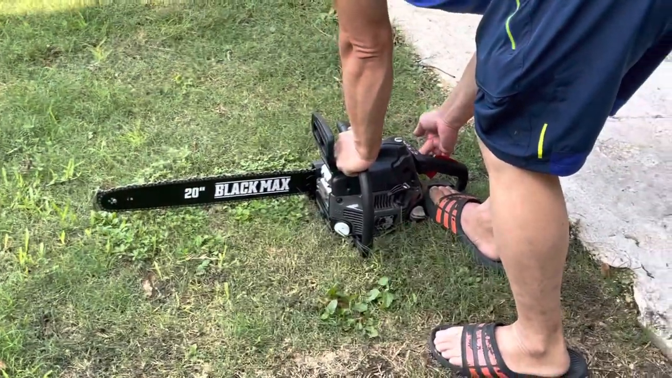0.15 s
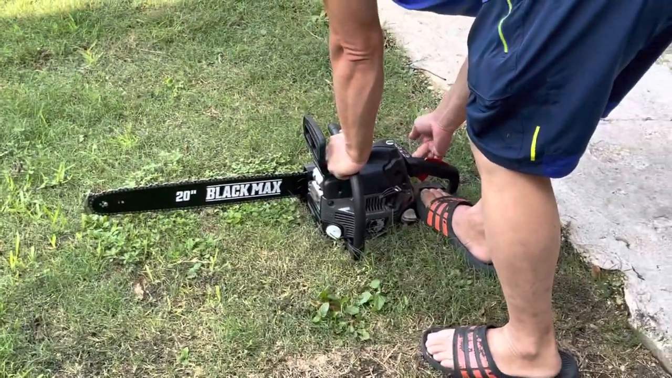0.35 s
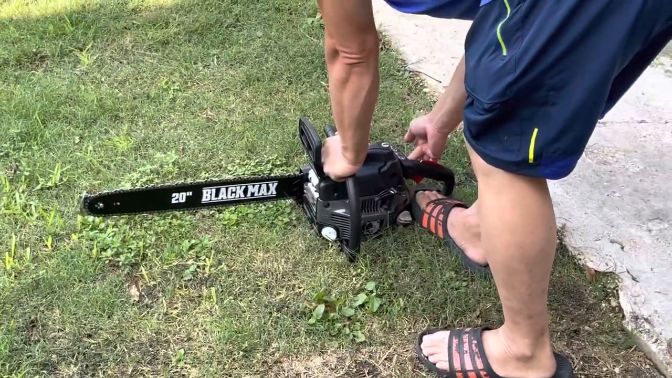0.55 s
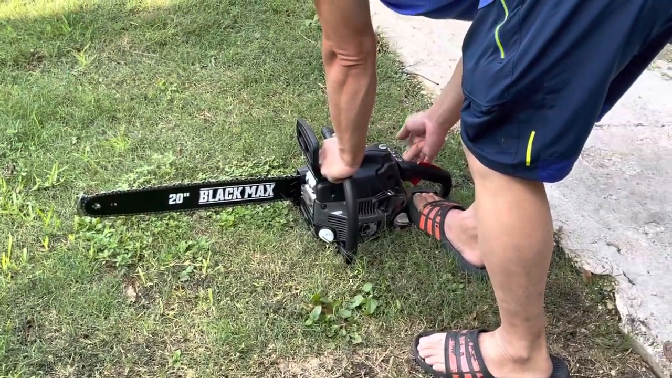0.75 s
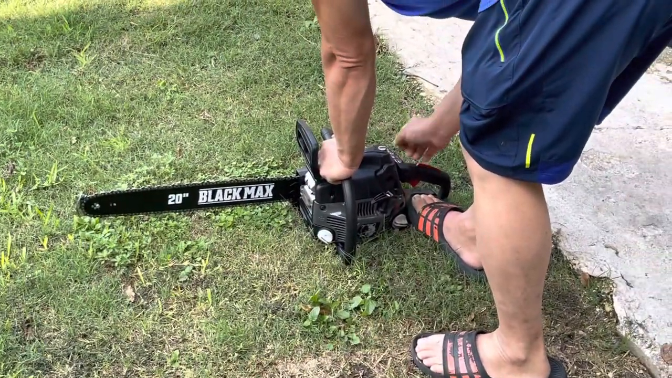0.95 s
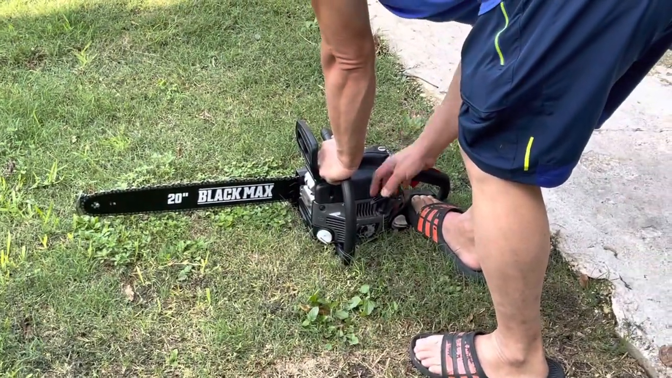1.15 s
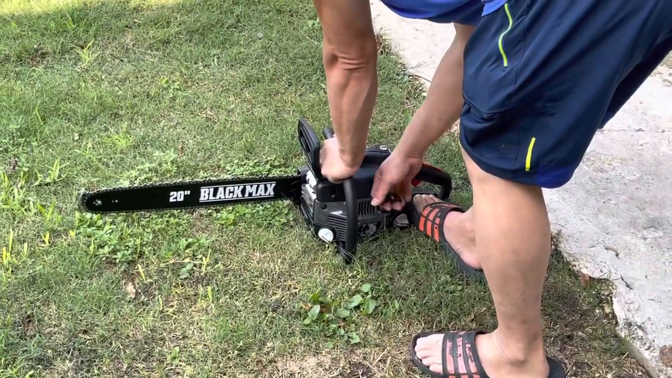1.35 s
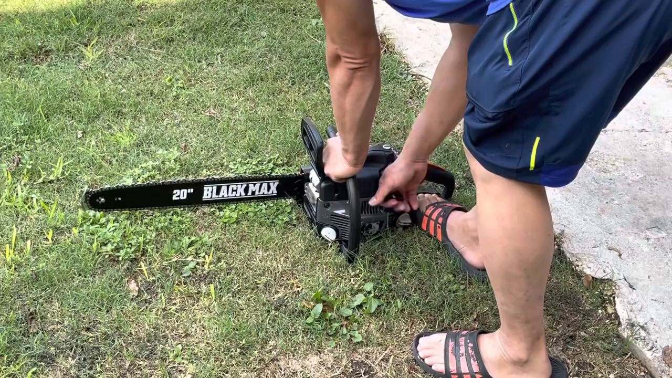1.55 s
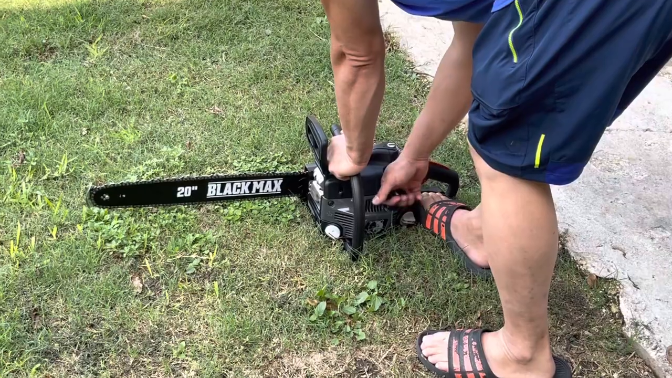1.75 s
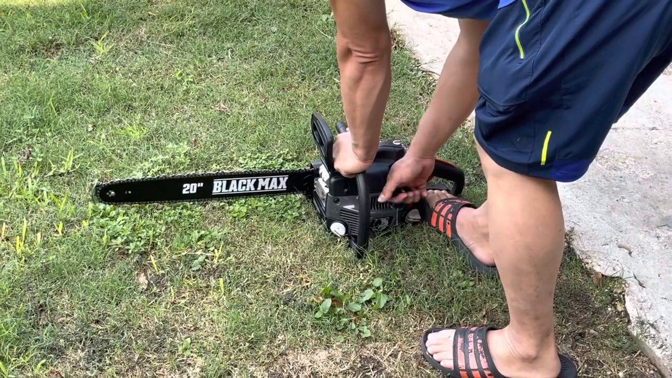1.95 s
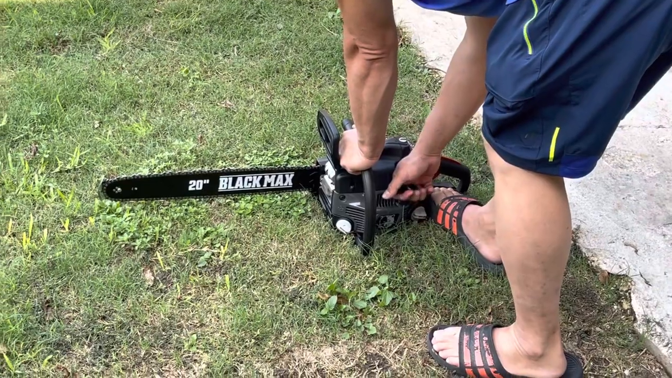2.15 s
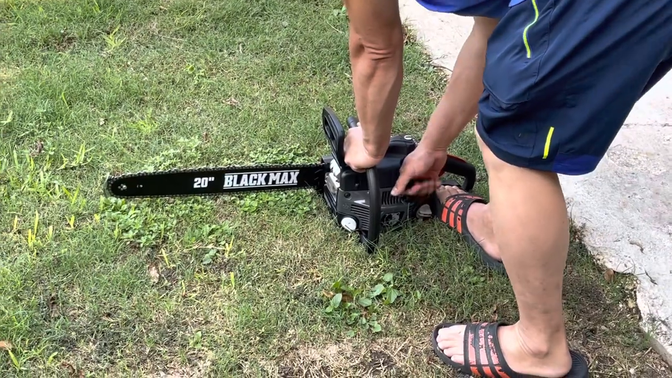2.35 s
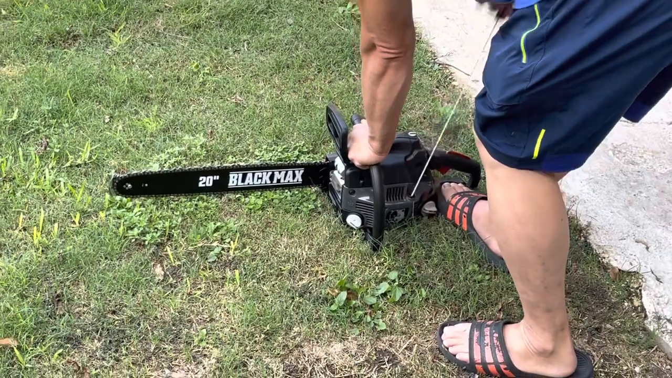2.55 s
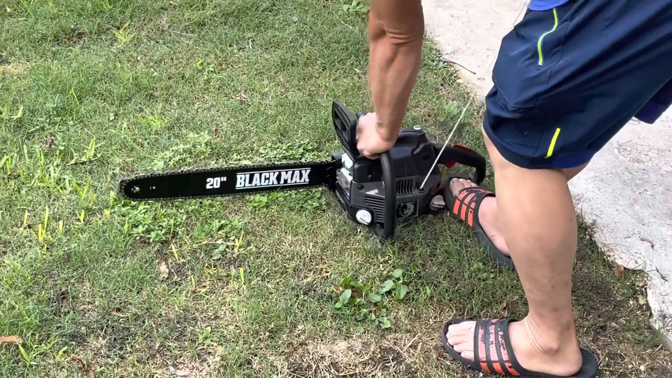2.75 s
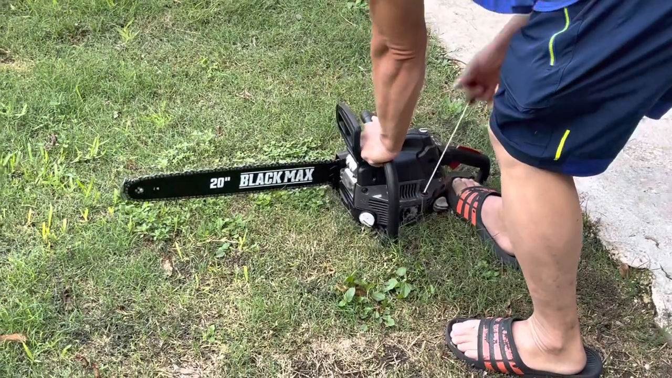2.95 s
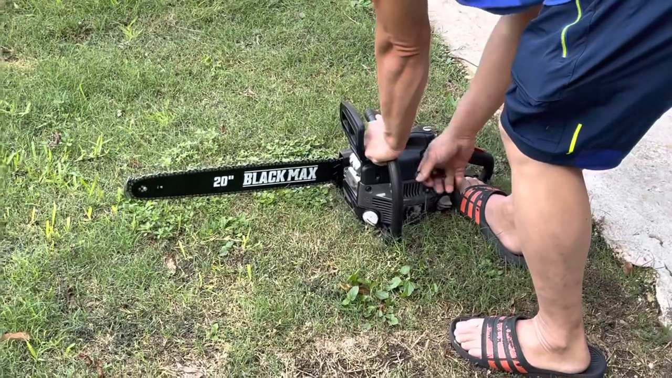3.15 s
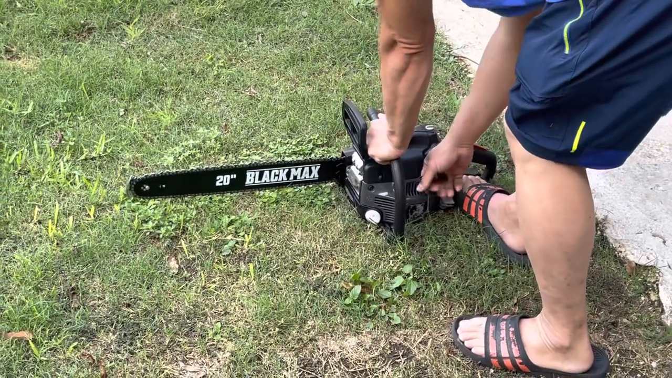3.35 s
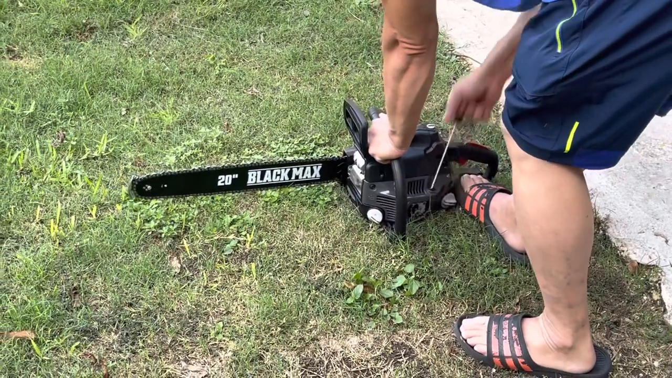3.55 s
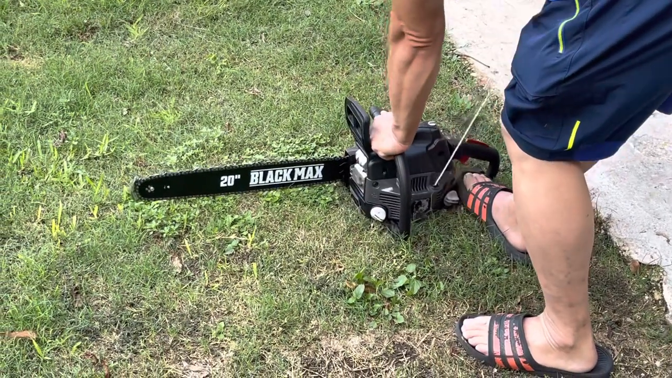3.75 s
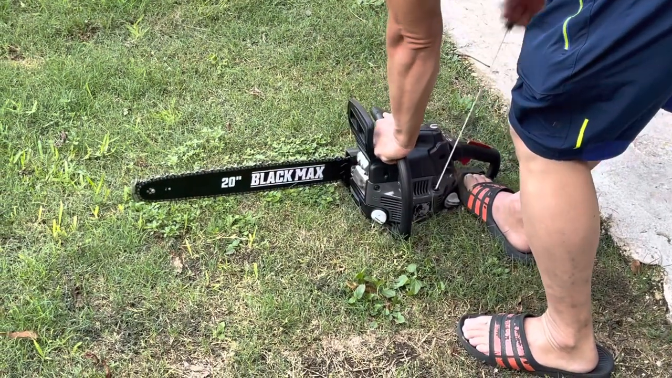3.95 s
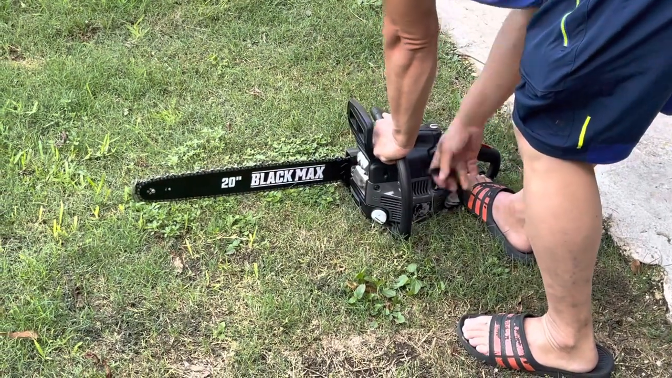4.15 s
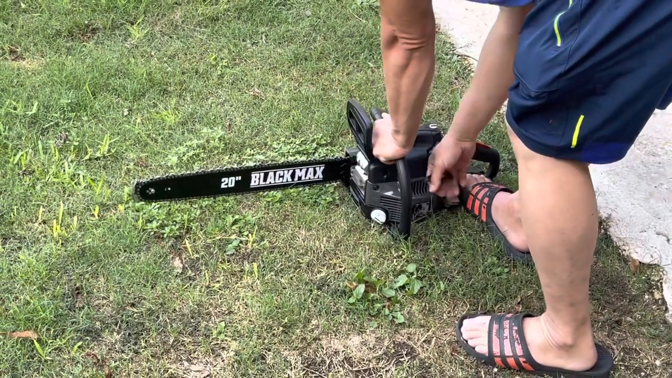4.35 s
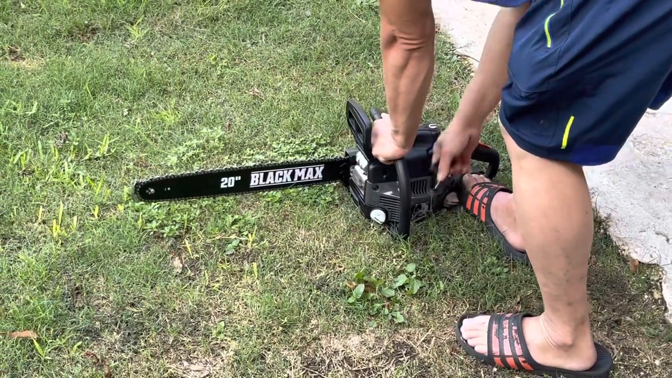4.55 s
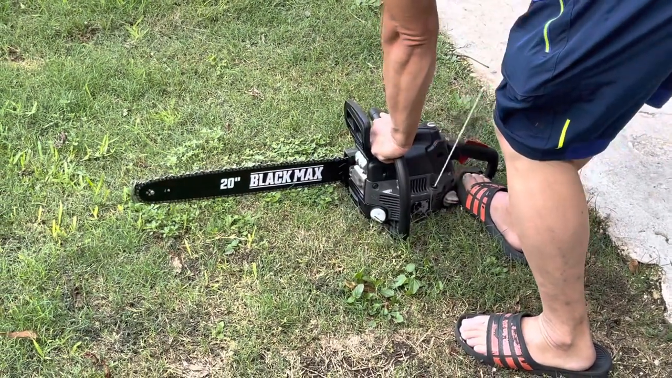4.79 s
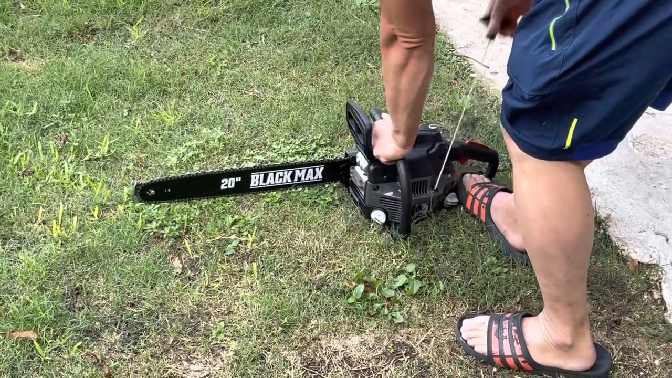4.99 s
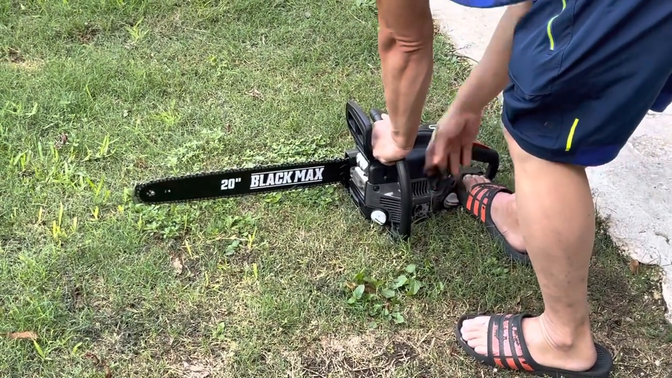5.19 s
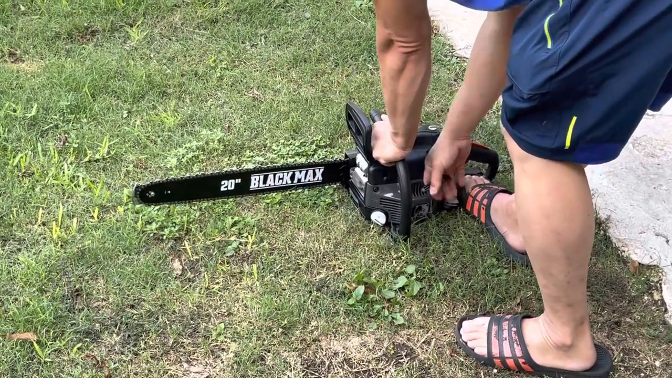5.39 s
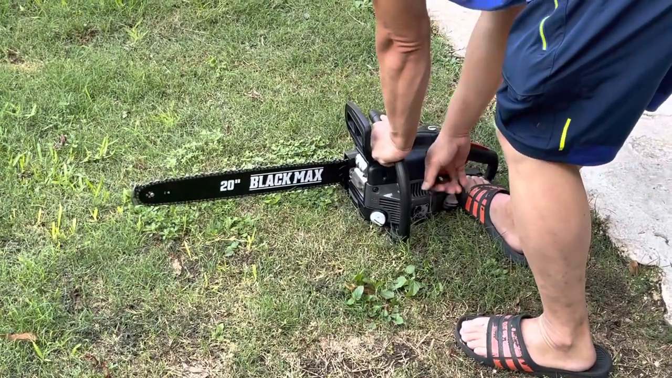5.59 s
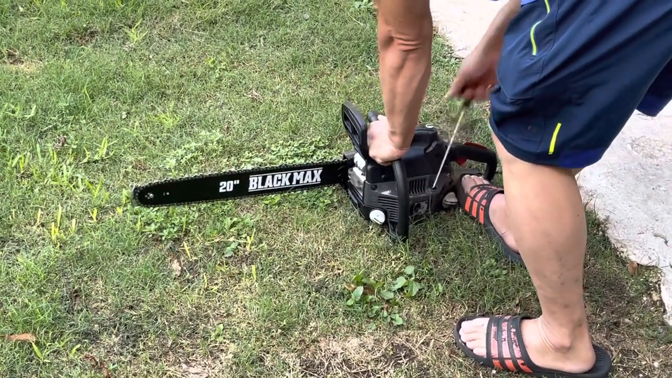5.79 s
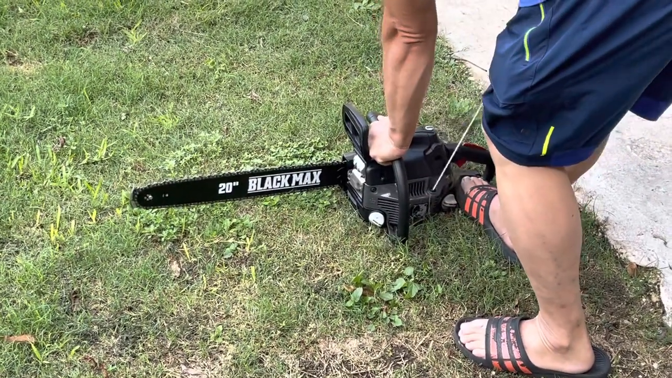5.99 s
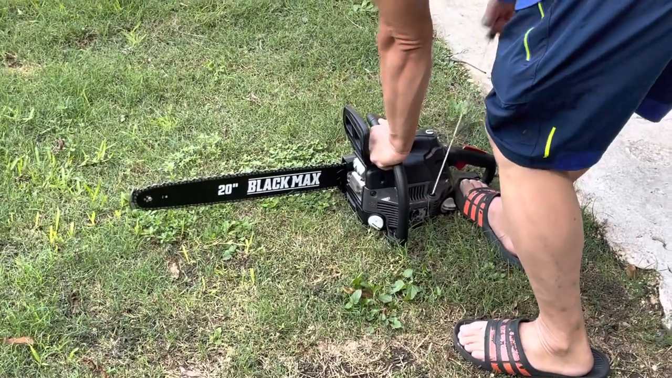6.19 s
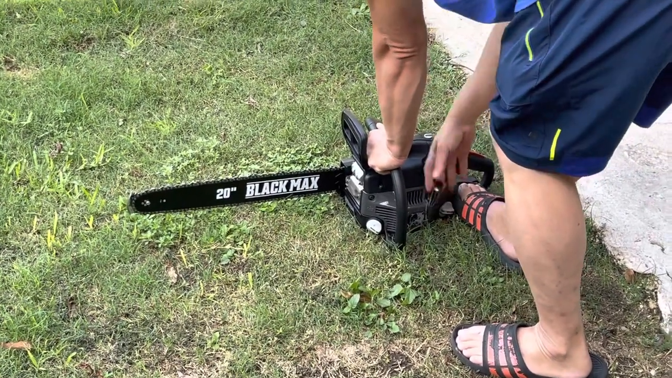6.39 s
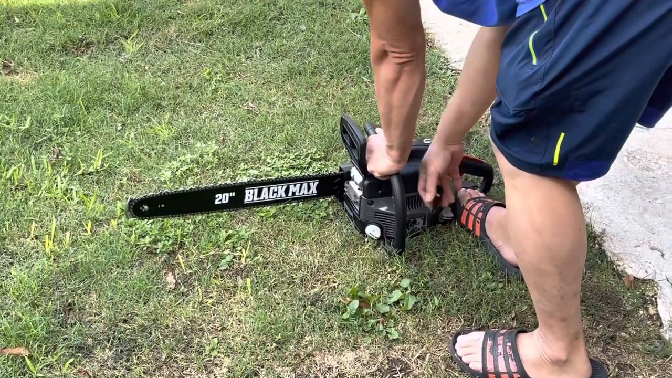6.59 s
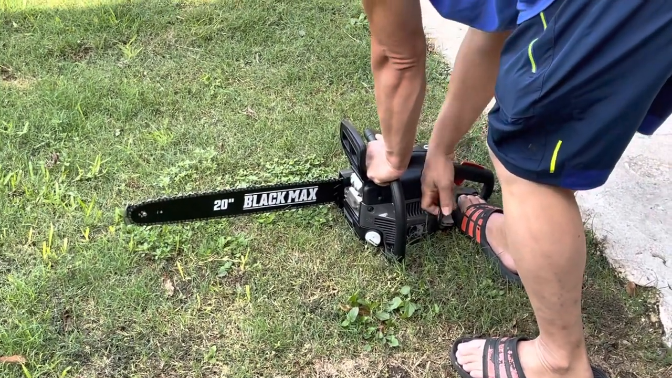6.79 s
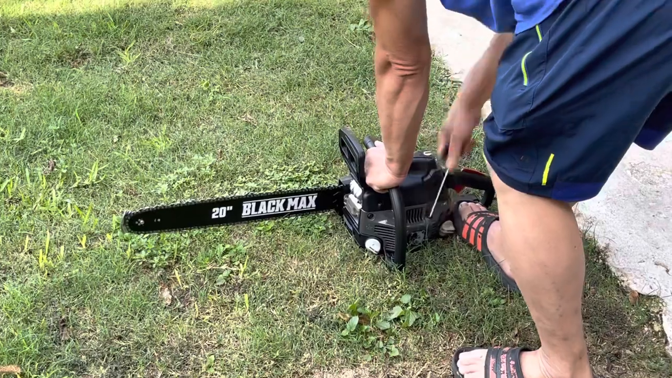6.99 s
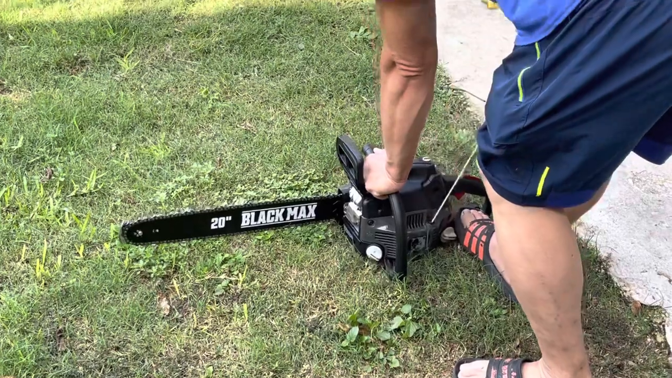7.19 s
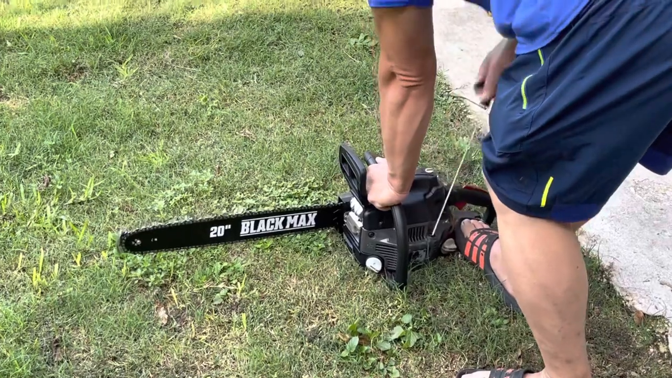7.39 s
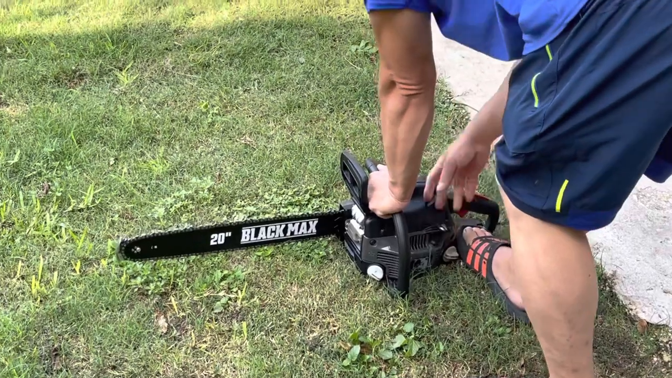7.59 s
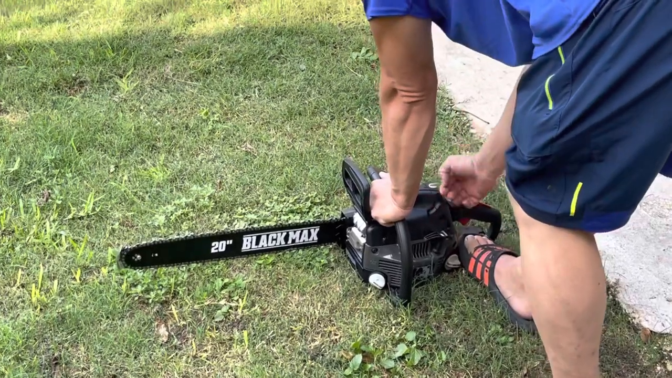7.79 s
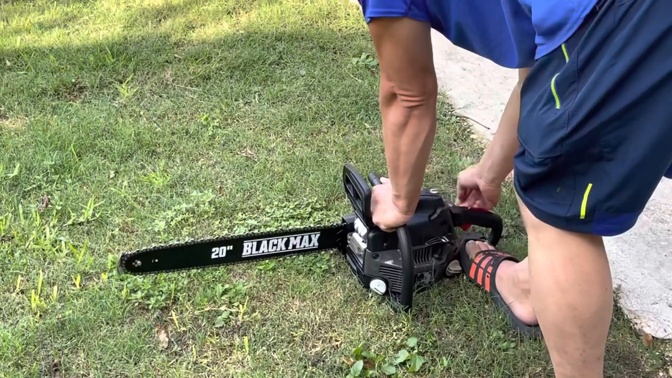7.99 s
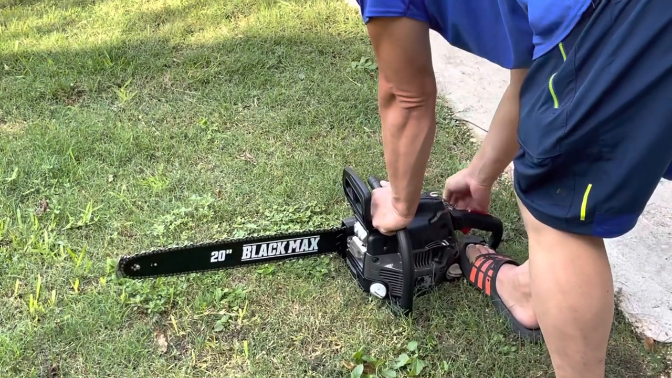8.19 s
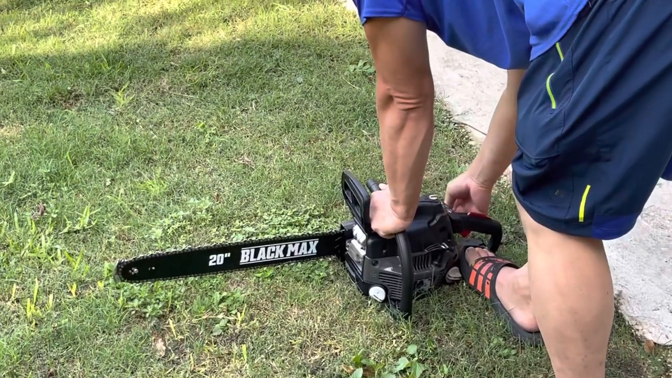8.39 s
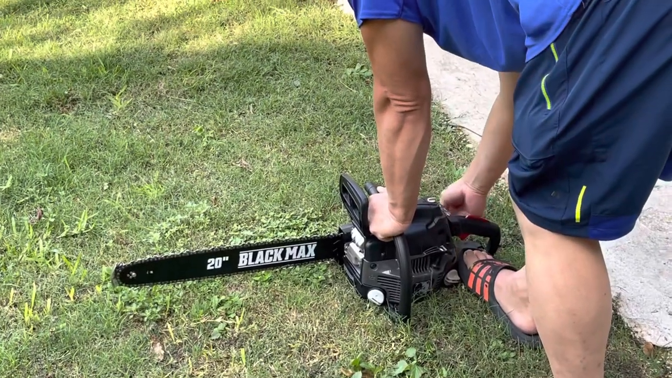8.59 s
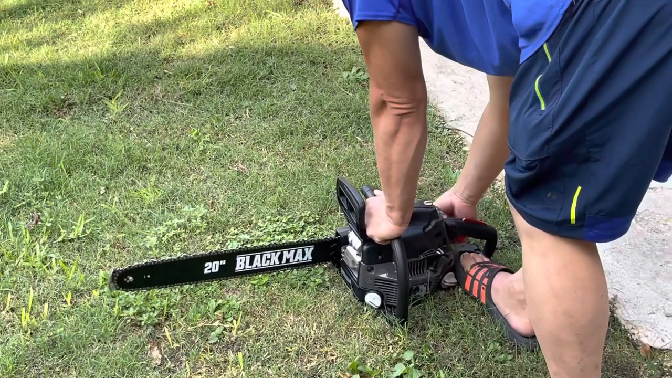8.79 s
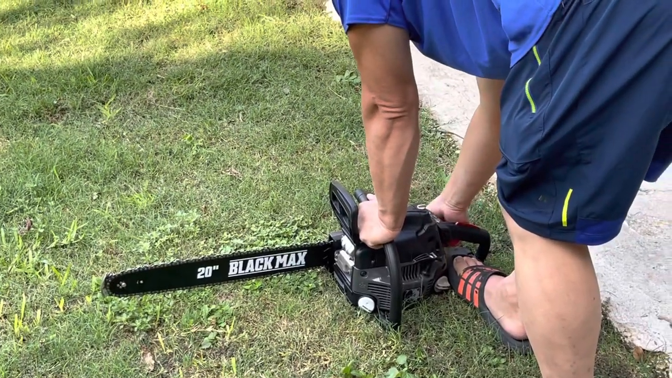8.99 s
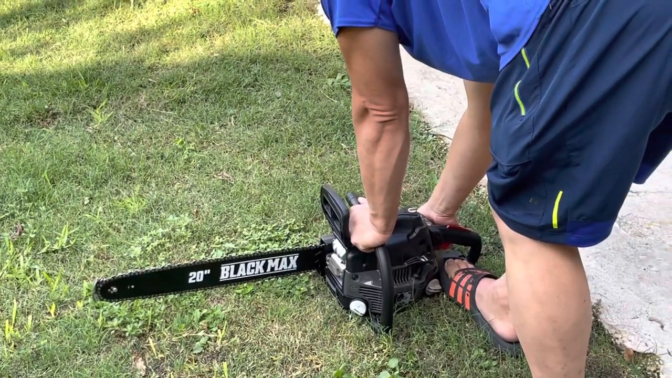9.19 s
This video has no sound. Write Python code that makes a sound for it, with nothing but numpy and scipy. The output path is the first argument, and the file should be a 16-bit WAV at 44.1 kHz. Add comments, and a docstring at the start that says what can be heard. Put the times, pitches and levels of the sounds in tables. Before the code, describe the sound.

On a lawn, a chainsaw's starter cord is yanked five times with dull compression thumps and clicking rewinds, but the engine never fires.

```python
"""A deep hum and distant traffic are heard first, with thin chirps of birds: noise bands and gliding tones.
Then a two-stroke chainsaw on a lawn is pulled five times without firing. Each yank catches with a clack
and thumps the piston over a few compressions: gliding gas pulses and bursts of noise. The cord rewinds over
clicking pawls (noise bursts and ringing modes), and after four of the rewinds the handle snaps home.
Paving and yard answer with early echoes and a decaying tail."""
import sys
import numpy as np
from scipy import signal
from scipy.fft import rfft, irfft, next_fast_len
from scipy.io import wavfile
from scipy.ndimage import uniform_filter1d, map_coordinates

SR = 44100
rng = np.random.default_rng(int(sys.argv[2]) if len(sys.argv) > 2 else 0)


def output_pcm(signal):
    """Save a mono or channel-first signal as 16-bit PCM at the path in sys.argv[1].

    Samples are clipped to [-1, 1] before scaling.
    """
    pcm = np.clip(np.atleast_2d(signal).T, -1, 1) * 32767
    wavfile.write(sys.argv[1], SR, np.round(pcm).astype(np.int16))


N = 407606
TIME = np.arange(N) / SR  # scene time [s]
AGE = np.arange(SR // 3) / SR  # time since a blow [s]

# All levels are relative: the functions weight each layer again.
# Compressions, full ones and then weak ones as the piston stalls: (time [s], thump [dB], rasp [dB])
STROKES = [(2.5057, -5.5, -33.5), (2.5472, -6.5, -33), (2.5955, -10, -33.5), (2.634, -18.5, -49.5),
           (2.651, -19.5, -48), (3.6173, -6.5, -32), (3.6564, -6.5, -32.5), (3.696, -7, -32.5),
           (3.733, -17, -43), (4.700, -4.5, -32), (4.737, -6, -32), (4.787, -16.5, -46),
           (5.8194, -5.5, -34.5), (5.8585, -7, -31), (5.9046, -8, -34.5), (5.942, -18.5, -53.5),
           (5.954, -18.5, -66), (7.0616, -4, -32.5), (7.0994, -6, -31.5), (7.140, -18.5, -43.5),
           (7.162, -17.5, -47)]
# Gas squeezed ahead of each thump: (frequency [Hz], density [dB per Hz])
SQUEEZE_SPECTRUM = [(100, -33), (280, 0.5), (420, 3.5), (580, 4), (680, -5.5), (800, -6), (1000, -30),
                    (1450, -5), (2000, -43), (6000, -100)]
# Breath of gas with each thump: (frequency [Hz], density [dB per Hz])
PUFF_SPECTRUM = [(50, -18.5), (110, 10.5), (230, 21), (550, 12), (780, -2), (1050, -19.5), (3000, -58)]
# Cranking rasp, also the cord and the spring: (frequency [Hz], density [dB per Hz])
RASP_SPECTRUM = [(300, -14), (1000, -17), (1450, 0.5), (3300, 2), (4500, -5.5), (9000, -4.5), (10700, -2),
                 (13000, -18), (16000, -54.5)]
# Crankcase modes: (frequency [Hz], level [dB], t60 [s])
CRANKCASE_MODES = [(2104, 6, 0.12), (2750, 9, 0.04), (3860, 7, 0.065), (7050, -10.5, 0.101)]

# Yanks: (starter catches [s], lets go [s], knock of letting go [dB])
PULLS = [(2.495, 2.655, -31.5), (3.605, 3.7546, -27), (4.689, 4.797, -27), (5.8103, 5.958, -28),
         (7.0535, 7.155, -27)]
# Rewinds: (start [s], end [s], clatter [dB], steel ring against the clatter [dB])
REWINDS = [(2.816, 3.17, -26, -11), (3.901, 4.214, -24.5, -5), (4.983, 5.216, -25.5, -14.5),
           (6.132, 6.372, -25.5, -6), (7.379, 7.591, -25.5, -11.5)]
# Pawls snapping off their teeth: (time [s], ping level [dB])
CLICKS = [(2.844, -15), (2.867, -21.5), (2.888, -3), (2.9089, -3), (2.9283, -17.5), (2.949, -3), (2.97, -4),
          (2.991, -7), (3.017, -12.5), (3.0478, 1.5), (3.1039, -5), (3.9168, -9), (3.935, -8), (3.952, -18),
          (3.969, -5), (3.987, -21), (4.004, -12), (4.0256, -14), (4.045, -13), (4.0683, -19.5),
          (4.092, -14.5), (4.123, -5), (4.161, -13.5), (5.008, -10), (5.034, -15), (5.0585, -3.5),
          (5.0827, -8), (5.106, -4), (5.1262, -21.5), (5.1558, -14.5), (5.186, 0.5), (6.1528, -5.5),
          (6.177, -15), (6.1978, -1.5), (6.22, -2), (6.2398, -3.5), (6.2598, 1.5), (6.2806, -5),
          (6.3005, -9.5), (6.32, -4.5), (6.335, -3), (7.411, -25), (7.4404, -8), (7.469, -11), (7.496, 0.5),
          (7.526, -13), (7.550, -6.5)]
# A pawl engaging as slack is taken up: (time [s], clatter [dB], flywheel ring [dB], favoured mode [Hz])
ENGAGES = [(3.506, -32.5, -31, 4590), (4.568, -30.5, -36, 4050)]
# Starter clicks: (frequency [Hz], density [dB per Hz])
CLICK_SPECTRUM = [(300, -63.5), (600, -10.5), (1200, -26.5), (2100, -11), (3500, -10.5), (6200, -12.5),
                  (7100, -8.5), (7700, -12), (8500, -4), (9300, -7), (10600, 4.5), (11500, -7.5),
                  (13000, -11.5), (14200, -16.5), (16000, -28.5)]
# Flywheel modes: (frequency [Hz], level [dB], t60 [s])
FLYWHEEL_MODES = [(2137, -14, .13), (3768, -6, .09), (3950, -9, .08), (4161, -8, .1), (4578, -7.5, .12),
                  (4683, -5.5, .12), (5116, -8, .12), (5740, -12, .1), (6090, -11, .1)]
# Steel pawl modes: (frequency [Hz], level [dB], t60 [s])
PAWL_MODES = [(8880, -7, .08), (9173, -.5, .16), (9300, -7, .12), (11510, 2.5, .08)]
# Plastic starter cover modes: (frequency [Hz], level [dB], t60 [s])
COVER_MODES = [(695, -5.5, 0.032), (1615, -6.5, 0.016)]
# Against the click rate: a faster pulley clatters louder, and chatter and ring grow more
CLATTER_DB_PER_DOUBLING, RATTLE_DB_PER_DOUBLING = 1, 4.5
FLYWHEEL_DB, FLYWHEEL_SCATTER_DB = -4.5, 3  # ring against the clatter, and its standard deviation
TOOTH_RATTLE_DB = -7  # the pawl chatters up the next tooth
TOOTH_HZ, TOOTH_SPREAD_HZ, TOOTH_DB = 3160, 775, 1.5  # each landing has its own pitch
SKID_SHARE, SKID_S = 0.11, 0.007  # it starts higher by this share and sinks with this time constant
COVER_LAG_S = 0.00337  # the cover answers once the pawl has landed

# The handle snapping home: (time [s], level [dB], bounce delay [s], bounce against the first blow [dB])
STOPS = [(4.199, -18, .006, -14), (5.207, -7, 0.005, -1.5), (6.350, -1, .0085, -9.5),
         (7.572, -1, 0.0052, -4.5)]
# Starter housing modes under the handle's blow: (frequency [Hz], level [dB], t60 [s])
SEAT_MODES = [(400, 1.5, .04), (770, 10, 0.019), (1399, 7.5, 0.055), (1840, 3.5, 0.095), (2810, -3, 0.06),
              (3570, 5.5, 0.065)]
# Thud of the saw's body: (frequency [Hz], density [dB per Hz])
THUD_SPECTRUM = [(150, -36), (350, -2), (480, 0), (850, 0), (1300, -20), (4000, -70)]
SETTLE_S = .0025  # the handle's rim strikes first, then it lands flat
THUD_LAG_S, THUD_DB = 0.00514, -22  # the saw's body gives under the blow
SHIVER_DB, SHIVER_T60_S = -26.5, 0.47  # the recoil spring shivers on after the stop

# Loose plastic knocks of handle and controls:
# (time [s], level [dB], brightest [Hz], hollow low part [dB], lift at the brightest [dB])
LOOSE_KNOCKS = [(2.778, -34, 3920, -36, 4), (3.1548, -29, 2480, -3, -2), (3.2141, -20.5, 2300, -11, 7),
                (4.5225, -27, 1590, -9, 6.5), (5.1903, -12.5, 1700, 7, -0.5), (7.587, -11.5, 1400, -2, -4),
                (7.634, -20, 3360, -19, 10), (7.649, -26, 3100, -10, 5), (8.035, -44.5, 2400, -16, 12),
                (9.0723, -41, 3820, -15, 2)]
# Plastic housing: (frequency [Hz], density [dB per Hz])
HOUSING_SPECTRUM = [(120, -43), (350, 13.5), (650, 7), (1400, 4.5), (3400, -1), (4500, -7.5), (7000, -10.5),
                    (11000, -5.5), (13000, -21), (16000, -41.5)]
CATCH_DB = -18.5  # the starter catches with a clack ahead of the first stroke
# A faint hiss of cord in its guide, pulled and rewinding; its level is smoothed over the time given
CORD_OUT_DB, CORD_BACK_DB, CORD_SMOOTH_S = -46.5, -46, 0.28
# Squeaks as the hand shifts: (time [s], length [s], start [Hz], end [Hz], level [dB])
RUBS = [(0.496, 0.033, 2600, 2430, -48.5), (3.339, 0.051, 2550, 2150, -41), (4.332, 0.038, 2560, 1960, -39)]
# Squeak harmonics: (harmonic number, level [dB])
GRIP_HARMONICS = [(1, 1.5), (2, -15), (3, -9)]
SQUEAK_ROUGH_HZ = 320  # rms pitch jitter

# Early echoes of paving and legs: (frequency [Hz], gain [dB])
PAVING_GAIN = [(100, -30.5), (250, -23), (600, -18), (1500, -24), (4000, -22.5), (12000, -25.5)]
# Decay of the yard: (frequency [Hz], t60 [s])
YARD_DECAY = [(150, 0.78), (800, 0.16), (3000, 0.84), (8000, 0.58), (13000, 0.11)]
# Bird whistles: (time [s], length [s], start [Hz], end [Hz], level [dB])
CHIRPS = [(0.8, 0.31, 3990, 3830, -55.5), (1.047, 0.38, 3900, 3870, -55), (1.524, 0.039, 6100, 5730, -49),
          (1.88, 0.145, 5000, 4900, -58), (2.11, 0.12, 6020, 4950, -54)]
# Distant road: (time [s], rumble level [dB], road hiss level [dB])
TRAFFIC = [(0.0, -44, -48), (6.41, -42.5, -47), (8.29, -45.5, -48.5), (8.7, -39, -48.5), (9.24, -37, -49)]
# Outdoor air: (frequency [Hz], density [dB per Hz])
AIR_SPECTRUM = [(25, -14), (40, 3.5), (60, 9), (110, -2.5), (330, -21), (900, -24), (2000, -38.5),
                (4000, -49.5), (7500, -55), (9500, -47.5), (10500, -57.5), (12500, -72.5), (16000, -91)]
# Stereo width of the air: (frequency [Hz], side against mid [dB])
AIR_WIDTH = [(60, -23), (130, -14), (250, -10), (550, -3), (1200, -9), (4000, -6)]
# Engine of a distant vehicle: (time [s], pitch [Hz], level [dB])
DRONE = [(0, 125, -68), (1.2, 121.8, -47), (2.9, 115, -45), (3.3, 112, -35), (3.85, 101, -29),
         (4.2, 92, -36), (5.4, 80, -40), (9.24, 74.4, -86)]
# A deeper hum: (time [s], pitch [Hz], level [dB])
HUM = [(0, 73.8, -38), (.5, 70.7, -23), (.9, 71.3, -47), (6.8, 66.1, -42), (8.7, 60.9, -26),
       (9.24, 59, -32)]
# Phase between the microphone ports: (frequency [Hz], left leads by [radians])
PORT_PHASE = [(300, 0), (1030, -.3), (2000, .35), (3270, .55), (4300, .45), (5430, .1), (6630, -.1),
              (7920, .3), (8610, 0), (9560, -2.1), (10800, -4), (11800, -6.1), (12400, -6.5), (13400, -9.3),
              (15000, -12.4)]
TOP_HZ = 16200  # half amplitude at the band limit


def piston():
    """Gas exchange: gas squeezes past the rising piston, the exhaust port thumps, then the intake puffs."""
    out = np.zeros(N)
    size = len(AGE)
    port = (1 + .5 * np.exp(-AGE / .003)) / (1 + (AGE / .016) ** 8)

    def rasp(db, t60, attack):
        """Friction: a burst of noise from random contact spots."""
        return amp(db) * patchy(noise(RASP_SPECTRUM, size), depth_db=5.5, width_hz=330) * fade(t60, attack)

    for s, db, rasp_db in STROKES:
        vigour = rng.uniform(.93, 1.07)
        exhaust = port * thump(start_hz=520 * vigour, end_hz=100 * vigour, glide=.0022, t60=.16)
        intake = thump(start_hz=760 * vigour, end_hz=232, glide=.0016, t60=.06)
        squeeze = noise(SQUEEZE_SPECTRUM, size) * fade(t60=0.042, attack=0.0032)
        puff = noise(PUFF_SPECTRUM, size) * fade(t60=0.16, attack=0.0008)
        add(out, s - .0085, amp(db - 10.5) * squeeze)
        add(out, s, amp(db - 4) * exhaust)
        add(out, s + .013, amp(db - 12) * intake)
        add(out, s, amp(db - 18) * puff)
        # the drive's slack is taken up, snaps over at the top of the stroke, rattles on and slaps back
        add(out, s - .009, rasp(rasp_db, t60=0.061, attack=0.002))
        add(out, s - .001, rasp(rasp_db + 18, t60=0.0098, attack=0.0014))
        add(out, s, rasp(rasp_db - 3.5, t60=0.18, attack=0.004))
        loose = rattle(length_s=.034, centre_hz=2570, octaves=0.89, t60=.009, count=45)
        add(out, s, amp(rasp_db + 1) * loose)
        for delay, slap_db in rng.uniform([.014, -9], [.022, 2], (2, 2)):
            add(out, s + delay, rasp(rasp_db + slap_db + 4, t60=0.02, attack=.0005))
        add(out, s, amp(rasp_db - 8.5) * ring(CRANKCASE_MODES, scatter_db=4))
    return out


def thump(start_hz, end_hz, glide, t60):
    """Pressure release: a gas pulse whose pitch drops as the pressure in the muffler escapes."""
    hz = end_hz + (start_hz - end_hz) * np.exp(-AGE / glide)
    return -np.sin(phase(hz)) * fade(t60, attack=0.00072)


def ratchet():
    """Repeated impact: pawls click over the teeth in a rewind, and some engage singly before a pull."""
    out = np.zeros(N)
    for start_s, end_s, clatter_db, steel_db in REWINDS:
        times, pings = np.transpose([row for row in CLICKS if start_s < row[0] < end_s])
        rates = 1 / np.gradient(times)
        speed_doublings = np.log2(rates / np.median(rates))
        for s, doublings, ping_db in zip(times, speed_doublings, pings):
            db = clatter_db + CLATTER_DB_PER_DOUBLING * doublings
            shaken_db = clatter_db + RATTLE_DB_PER_DOUBLING * doublings
            ring_db = shaken_db + FLYWHEEL_DB + FLYWHEEL_SCATTER_DB * rng.normal()
            add(out, s, snap(ping_db) + pawl(db, ring_db, steel_db))
            if s > times[0]:
                chatter = rattle(length_s=.012, centre_hz=3000, octaves=1.3, t60=0.0088, count=18)
                add(out, s - .011, amp(shaken_db + TOOTH_RATTLE_DB) * chatter)
    for s, clatter_db, ring_db, mode_hz in ENGAGES:
        # a resonance 60 Hz wide lifts the favoured mode
        favour = lambda hz: 1 + amp(5) * 1j * hz * 60 / (mode_hz ** 2 - hz ** 2 + 1j * hz * 60)
        add(out, s, filtered(pawl(clatter_db, ring_db), favour))
    return out


def pawl(clatter_db, ring_db, steel_db=-7):
    """Impact and friction: a pawl lands, skids with falling pitch, bounces once and rings the steel."""
    size = len(AGE)
    grit = lambda: patchy(noise(CLICK_SPECTRUM, size), depth_db=3.5, width_hz=530)
    clatter = grit() * fade(t60=0.041, attack=0.001)
    bounce = amp(-11.5) * grit() * fade(t60=0.012, attack=0.0013)
    add(clatter, rng.uniform(0.0021, .007), bounce)
    landing_hz = TOOTH_HZ + TOOTH_SPREAD_HZ * rng.uniform(-1.1, 1)
    hz = landing_hz * (1 + SKID_SHARE * np.exp(-AGE / SKID_S))
    skid = amp(TOOTH_DB) * np.sin(phase(hz)) * fade(t60=0.021, attack=.0006)
    cover = amp(-10.5) * noise(HOUSING_SPECTRUM, size) * fade(t60=0.038, attack=.006)
    add(cover, COVER_LAG_S, amp(-3) * ring(COVER_MODES, scatter_db=3, detune_hz=70))
    flywheel = ring(FLYWHEEL_MODES, scatter_db=6)
    steel = amp(steel_db - 1) * ring(PAWL_MODES, scatter_db=4, detune_hz=7)
    return amp(clatter_db) * (amp(10) * clatter + skid + cover + steel) + amp(ring_db - 2) * flywheel


def snap(db):
    """Elastic release: the sharp ping of a pawl leaving its tooth."""
    ping_hz = 11280 + 300 * rng.uniform(-1, 1)
    ping = np.sin(2 * np.pi * ping_hz * AGE) * fade(t60=0.013, attack=0.00045)
    tick = noise(CLICK_SPECTRUM, len(AGE)) * fade(t60=0.0082, attack=0.00044)
    return amp(db - 2.5) * (ping + amp(-13) * tick)


def handle():
    """Impact and rebound: the handle hits its seat and bounces; body thuds, pawls shake, spring rattles."""
    out = np.zeros(N)
    size = len(AGE)
    for s, db, bounce_s, bounce_db in STOPS:
        rebound_db = db + bounce_db
        add(out, s, knock(db + 1, spot_hz=3430, hollow_db=-10.5, spot_db=7, t60=0.02))
        add(out, s + SETTLE_S, knock(db - 3.5, spot_hz=2780, hollow_db=-5, spot_db=5, t60=0.03))
        add(out, s + SETTLE_S, amp(db - 24.5) * ring(SEAT_MODES, scatter_db=4, detune_hz=60))
        thud = noise(THUD_SPECTRUM, size) * fade(t60=0.036, attack=0.0041)
        add(out, s + THUD_LAG_S, amp(db + THUD_DB) * thud)
        bounce = knock(rebound_db, spot_hz=2700, hollow_db=5.5, t60=0.022)
        add(out, s + bounce_s, bounce + snap(rebound_db + 2.5))
        add(out, s - .004, pawl(rebound_db - 13.5, rebound_db - 18.5))
        coils = rattle(length_s=.12, centre_hz=2815, octaves=.7, t60=0.021, count=40)
        shiver = (noise(RASP_SPECTRUM, size) + amp(4.5) * coils) * fade(SHIVER_T60_S, attack=.006)
        add(out, s, amp(db + bounce_db / 2 + SHIVER_DB) * shiver)
    return out


def knocks():
    """Impact: the starter catches, lets go and ticks as the pulley reverses; loose parts knock between."""
    out = np.zeros(N)
    for catch_s, release_s, release_db in PULLS:
        add(out, catch_s, knock(CATCH_DB, spot_hz=2800, hollow_db=-7.5, spot_db=9.5, t60=0.035))
        add(out, release_s, knock(release_db, spot_hz=2720, hollow_db=1.5))
    for s, *_ in REWINDS:
        add(out, s, knock(db=-33.5, spot_hz=3400, hollow_db=-20))
    for s, db, spot_hz, hollow_db, spot_db in LOOSE_KNOCKS:
        add(out, s, knock(db + 5, spot_hz, hollow_db, spot_db, t60=0.022))
    return out


def knock(db, spot_hz, hollow_db, spot_db=5, t60=0.064):
    """Shell excitation: each spot favours its own pitch, and full blows stir the hollow low end."""
    def response(hz):
        """Radiation efficiency: the small shell gives little bass."""
        hollow = hollow_db / (1 + (hz / 1500) ** 4)
        spot = spot_db / (1 + ((hz - spot_hz) / 450) ** 2)
        return amp(hollow + spot) * hz ** 4 / (hz ** 4 + 470 ** 4)

    shell = unit(filtered(noise(HOUSING_SPECTRUM, len(AGE)), response))
    return amp(db - 5.5) * shell * fade(t60, attack=0.00083)


def cord():
    """Sliding friction: a faint hiss of cord in its guide around each pull and rewind, smoothed in level."""
    running = lambda start_s, end_s: (TIME > start_s) & (TIME < end_s)
    outward = sum(running(catch_s - .02, release_s + 0.027) for catch_s, release_s, _ in PULLS)
    back = sum(running(start_s + .03, end_s) for start_s, end_s, *_ in REWINDS)
    gain = amp(CORD_OUT_DB) * outward + amp(CORD_BACK_DB) * back
    smoothed = uniform_filter1d(gain, size=round(CORD_SMOOTH_S * SR))
    return smoothed * amp(2.5 * wobble(120)) * noise(RASP_SPECTRUM, N)


def rubs():
    """Harmonic series with pitch jitter: faint, rough squeaks of the grip, falling in pitch."""
    out = np.zeros(N)
    for s, length, start_hz, end_hz, db in RUBS:
        n = int(length * SR)
        jitter = SQUEAK_ROUGH_HZ * noise([(50, 0), (900, 0), (2500, -30)], n)
        turn = phase(np.linspace(start_hz, end_hz, n) + jitter)
        tones = sum(amp(level) * np.sin(k * turn) for k, level in GRIP_HARMONICS)
        swell = signal.windows.tukey(n, .6) * np.linspace(1, .4, n)
        add(out, s, amp(db) * swell * tones)
    return out


def paving(x):
    """Early reflection: paving and legs beside the saw scatter echoes, opposite in sign at the two ports."""
    echoes = np.zeros(len(AGE))
    for delay, size in rng.uniform([.001, -1], [.009, 1], (12, 2)):
        echoes[round(delay * SR)] += size
    scattered = signal.fftconvolve(x, echoes / np.linalg.norm(echoes))[:N]
    side = filtered(scattered, lambda hz: amp(along(PAVING_GAIN, hz)))
    return np.array([side, -side])


def yard(x):
    """Reverberation: walls and fences answer with a thin tail, different on each side."""
    hz, t, z = signal.stft(rng.standard_normal((2, SR * 3 // 4)), SR, nperseg=256)
    decay = amp(-60 * t / along(YARD_DECAY, hz)[:, None])
    tail = signal.istft(z * decay, SR, nperseg=256)[1]
    colour = [(70, -26), (160, -10), (600, 6.5), (3000, -13), (8000, -9.5), (11500, -2.5), (13500, -15)]
    tail = filtered(tail / np.linalg.norm(tail[0]), lambda hz: amp(along(colour, hz)))
    delayed = np.pad(x, (round(.008 * SR), 0))
    return signal.fftconvolve(delayed[None], tail, axes=1)[:, :N]


def birds():
    """Frequency and amplitude modulation: thin, trembling whistles whose level flutters."""
    out = np.zeros(N)
    for s, length, start_hz, end_hz, db in CHIRPS:
        n = int(length * SR)
        tremble = lambda: noise([(30, 0), (150, 0), (500, -40)], n)
        hz = np.linspace(start_hz, end_hz, n) + 125 * tremble()
        level = amp(db - 4 + 3 * tremble()) * signal.windows.tukey(n, .7)
        add(out, s, level * np.sin(phase(hz)))
    return out


def outdoors():
    """Superposition of distant sources: road rumble and hiss, with single engines standing out."""
    rumble_db, hiss_db = curves(TRAFFIC)
    air = np.array([noise(AIR_SPECTRUM, N) for _ in range(2)])
    mid, side = filtered(air, lambda hz: np.array([np.ones_like(hz), amp(along(AIR_WIDTH, hz))]))
    pair = np.array([mid + side, mid - side])
    low_share = lambda hz: 1 / (1 + (hz / 95) ** 4)
    low = unit(filtered(pair, low_share))
    high = unit(filtered(pair, lambda hz: 1 - low_share(hz)))
    rumble = low * amp(rumble_db - 7.5 + 0.73 * wobble(1.6))
    hiss = high * amp(hiss_db + 8 + 0.46 * wobble(2.6))
    vehicle = engine_far(DRONE, [(1, 0.5), (2, -7.5), (3.5, -19)], waver=0.35, roar_db=-9)
    hum = engine_far(HUM, [(1, -7.5)], waver=0.44, roar_db=-32)
    return rumble + hiss + vehicle + hum


def engine_far(rows, orders, waver, roar_db):
    """Engine orders: multiples of the firing rate, the higher the more blurred, in a dull exhaust roar."""
    hz, db = curves(rows)
    turn = phase(hz)
    tones = np.zeros(N)
    for k, level in orders:
        blurred = k * turn + k * waver * wobble(28)
        tones += amp(level) * amp(2.5 * wobble(12)) * np.sin(blurred)
    roar = noise([(60, -30), (130, 0), (240, 0), (420, -12), (900, -35), (3000, -120)], N)
    return amp(db) * (tones + amp(roar_db) * roar)


def ring(modes, scatter_db, detune_hz=14):
    """Modal synthesis: modes struck at new strengths and slightly new pitches as the parts turn."""
    out = np.zeros(len(AGE))
    for hz, db, t60 in modes:
        cycles = (hz + detune_hz * rng.normal()) * AGE + rng.random()
        strength = amp(db + scatter_db * rng.uniform(-0.4, 1))
        out += strength * fade(t60, attack=0.00025) * np.sin(2 * np.pi * cycles)
    return out


def rattle(length_s, centre_hz, octaves, t60, count):
    """Random impacts: a scatter of light contacts, each a short ring at its own pitch and strength."""
    out = np.zeros(len(AGE))
    shape = fade(t60, attack=.0002)
    for when, pitch, size in rng.uniform([0, -1, 0], [1, 1, 1], (count, 3)):
        hz = centre_hz * 2 ** (octaves * pitch)
        add(out, when * length_s, size ** 2 * shape * np.sin(2 * np.pi * hz * AGE))
    return out


def patchy(x, depth_db, width_hz):
    """Contact-dependent resonance: every new spot stirs its own random set of resonances."""
    knots = rng.standard_normal(256)
    uneven = lambda hz: amp(depth_db * np.interp(hz / width_hz, np.arange(len(knots)), knots))
    return unit(filtered(x, uneven))


def fade(t60, attack):
    """Exponential decay: the envelope of a blow, with t60 and attack time constant in seconds."""
    return 10 ** (-3 * AGE / t60) * (1 - np.exp(-AGE / attack))


def noise(spectrum, size):
    """Spectral shaping: coloured noise of rms 1."""
    return unit(filtered(rng.standard_normal(size), lambda hz: amp(along(spectrum, hz))))


def filtered(x, response):
    """Linear filtering: x times a complex response of frequency."""
    n = x.shape[-1]
    m = next_fast_len(n + 4096)
    return irfft(rfft(x, m) * response(np.fft.rfftfreq(m, 1 / SR)), m)[..., :n]


def phase(hz):
    """Phase is the running integral of frequency, in radians."""
    return 2 * np.pi * np.cumsum(hz) / SR


def wobble(rate):
    """Slow random modulation: a smooth curve with rate knots a second."""
    return map_coordinates(rng.standard_normal(int(N * rate / SR) + 4), [TIME * rate])


def curves(rows):
    """Linear interpolation in time: one value per sample for each column after the time."""
    s, *cols = np.transpose(rows)
    return [np.interp(TIME, s, c) for c in cols]


def along(points, hz):
    """Interpolation of (frequency [Hz], value) points on a logarithmic frequency axis."""
    f, v = np.transpose(points)
    return np.interp(np.log(hz + 1), np.log(f + 1), v)


def amp(db):
    """Logarithmic level: decibels to amplitude gain."""
    return 10 ** (np.asarray(db) / 20)


def unit(x):
    """Normalisation to rms 1."""
    return x / np.sqrt(np.mean(x ** 2) + 1e-20)


def add(track, s, sound):
    """Superposition: mix a sound into the track at s seconds."""
    part = track[max(round(s * SR), 0):][:len(sound)]
    part += sound[:len(part)]


def scene():
    """Direct and reflected sound: the saw straight ahead, the yard and the road around it."""
    saw = piston() + ratchet() + handle() + knocks() + cord() + rubs()
    song = birds()
    reflected = paving(saw) + yard(amp(-13) * saw + amp(-3) * song)
    return saw + reflected + amp(-6) * song + outdoors()


def record(dry):
    """Phase difference between two ports, widest in the high treble, under a steep band limit."""
    def response(hz):
        """Phase split evenly: half the difference is added on the left and taken off on the right."""
        half_phase = .5j * along(PORT_PHASE, hz) * np.array([[1], [-1]])
        return np.exp(half_phase) / (1 + (hz / TOP_HZ) ** 80)

    return filtered(dry, response)


dry = scene()
out = record(dry)
output_pcm(out)
```